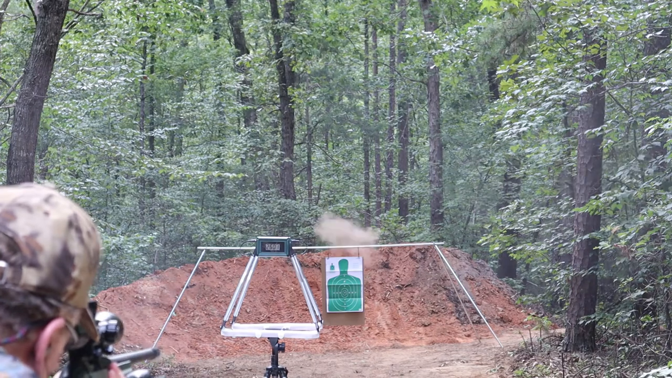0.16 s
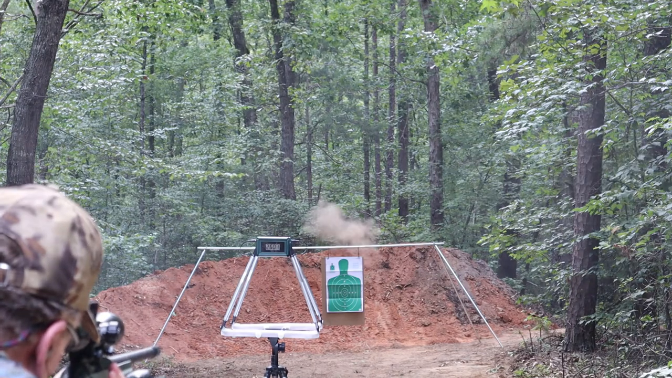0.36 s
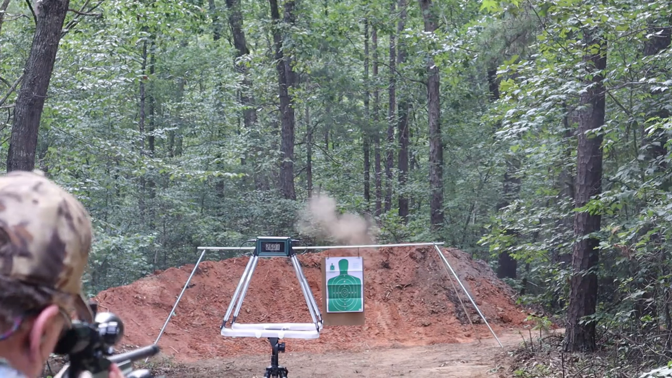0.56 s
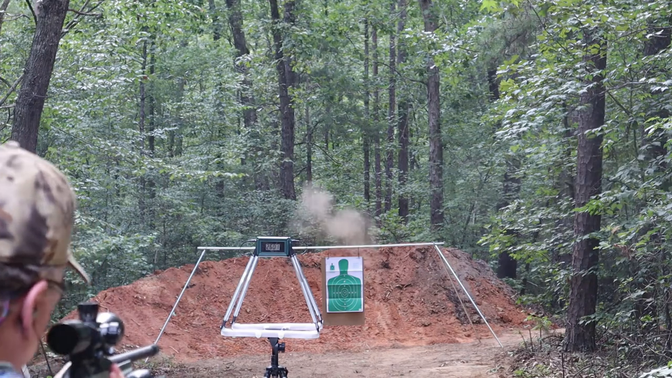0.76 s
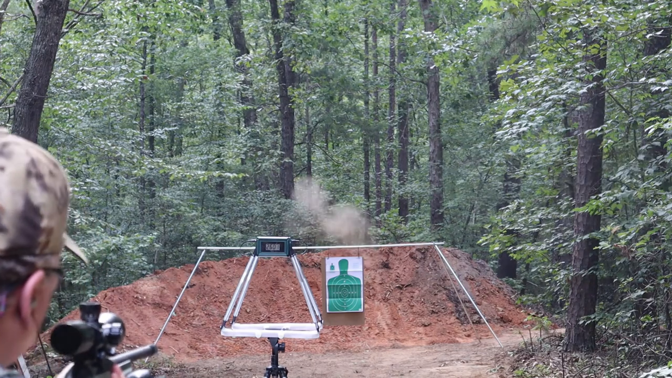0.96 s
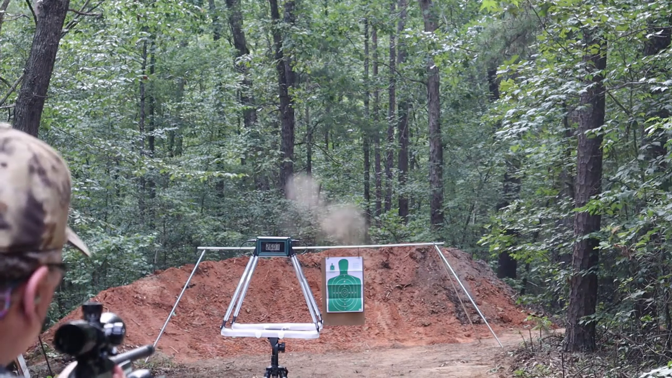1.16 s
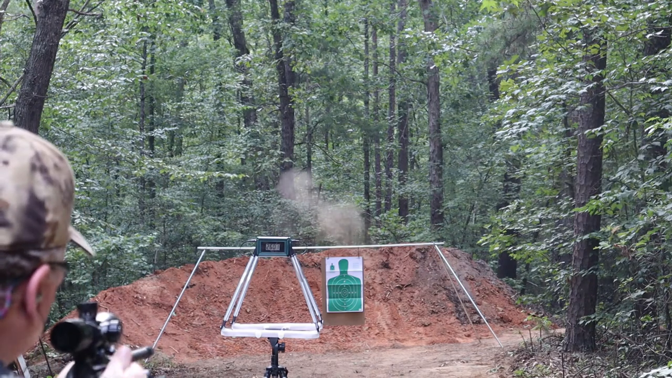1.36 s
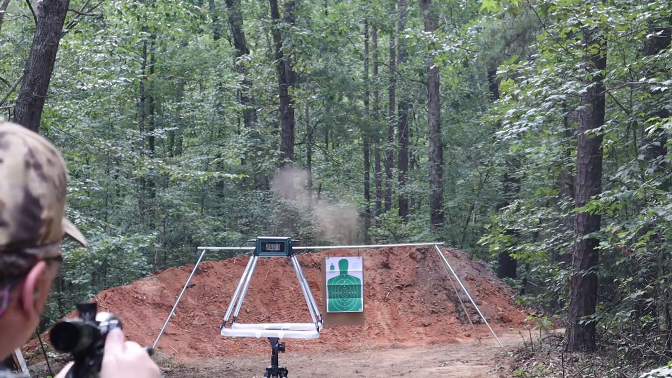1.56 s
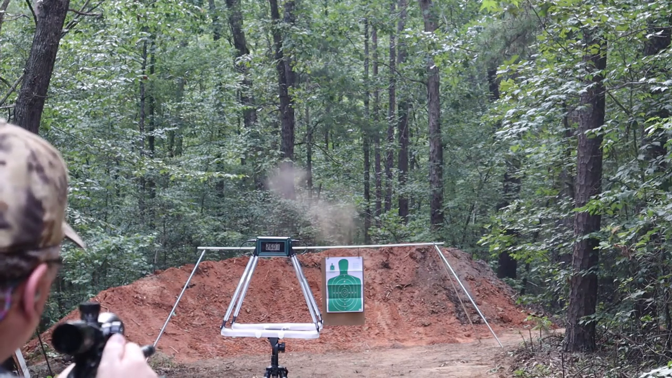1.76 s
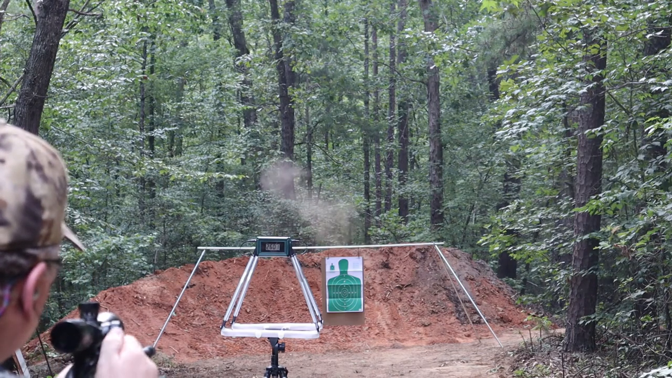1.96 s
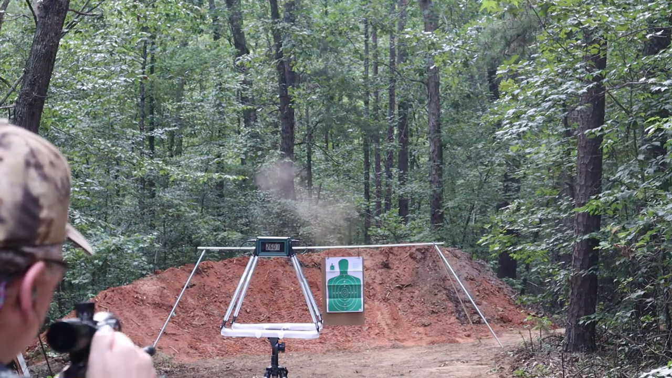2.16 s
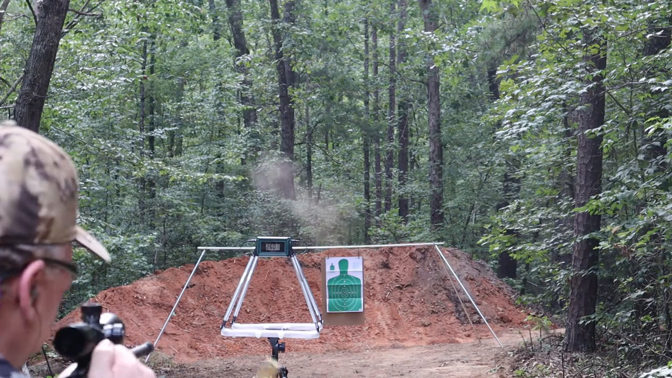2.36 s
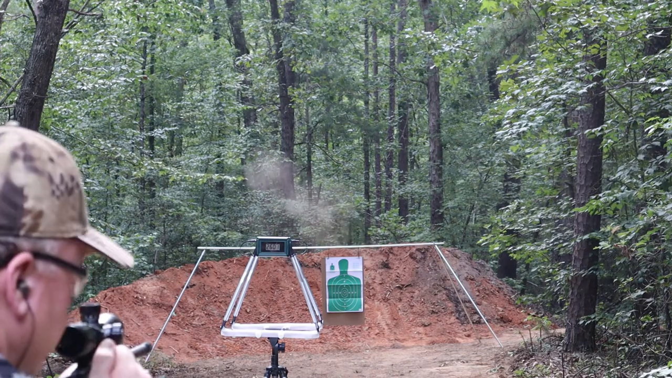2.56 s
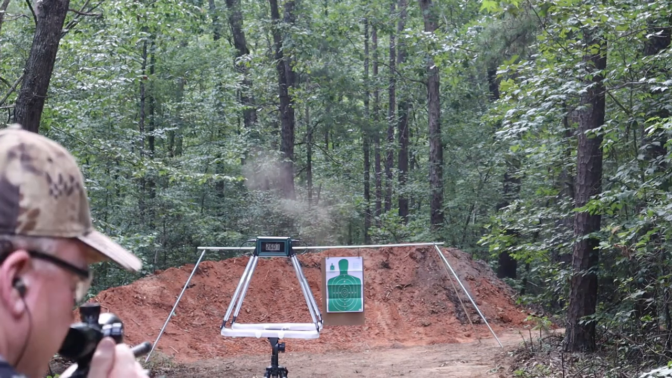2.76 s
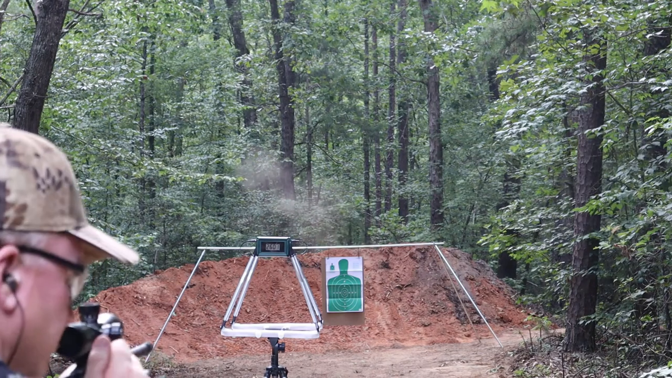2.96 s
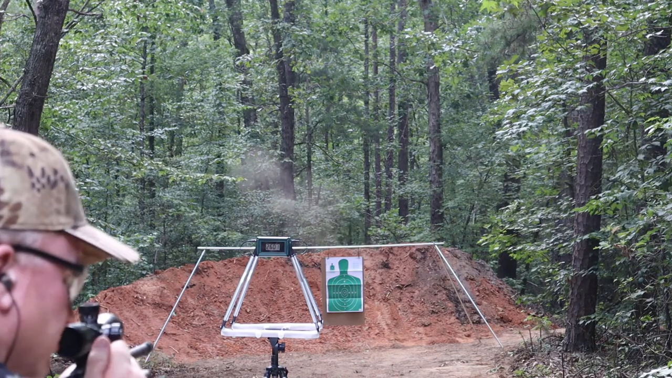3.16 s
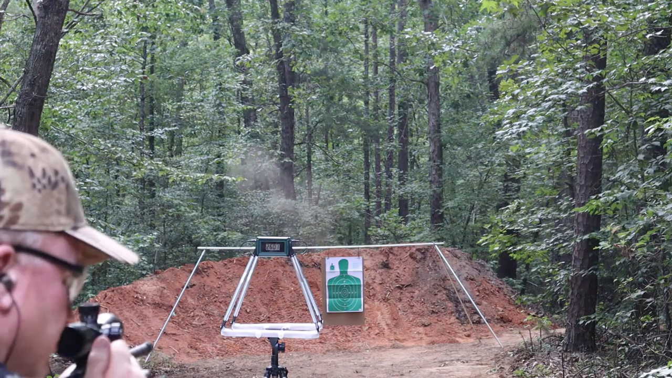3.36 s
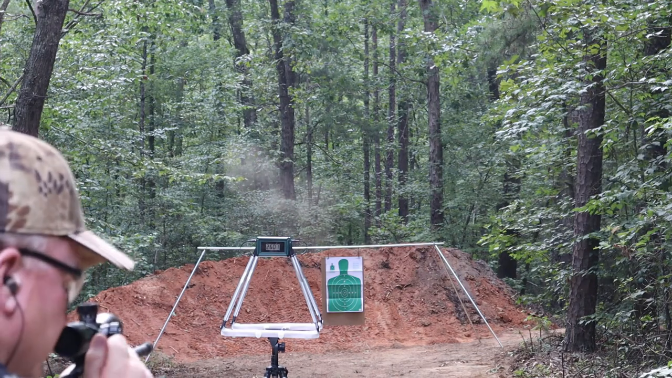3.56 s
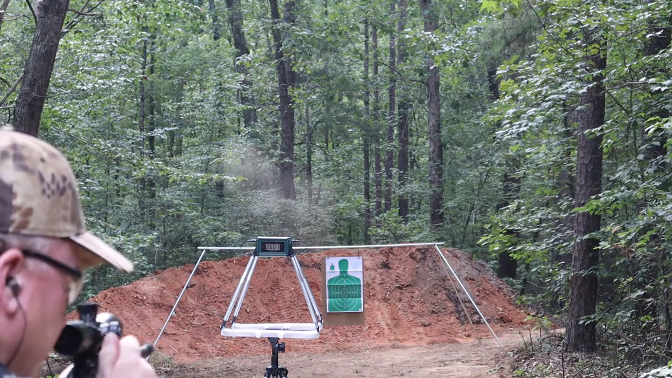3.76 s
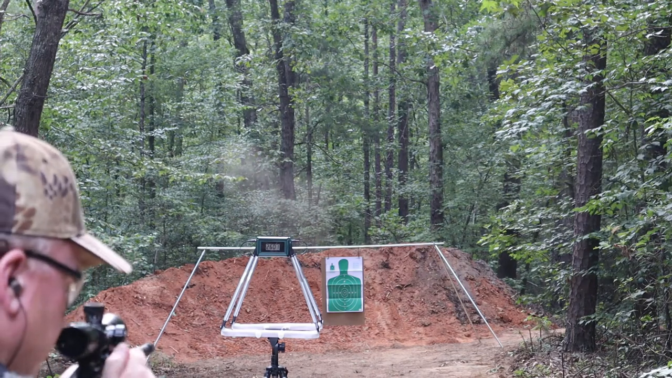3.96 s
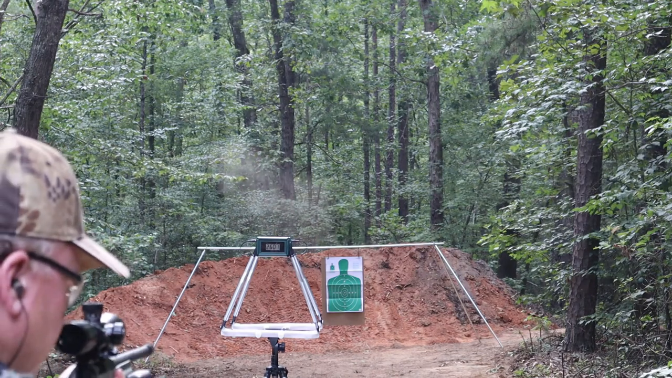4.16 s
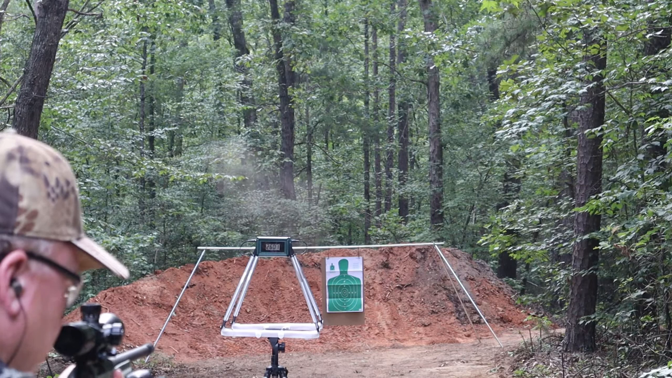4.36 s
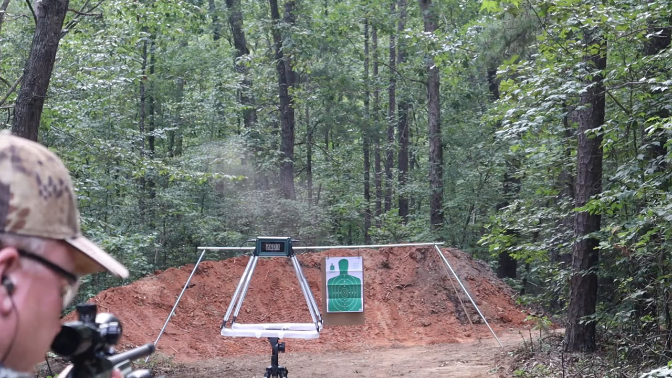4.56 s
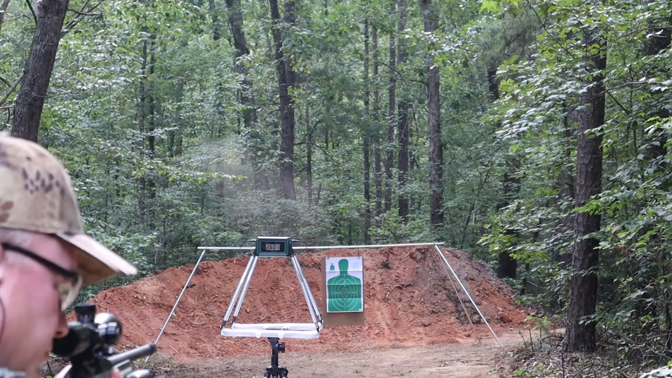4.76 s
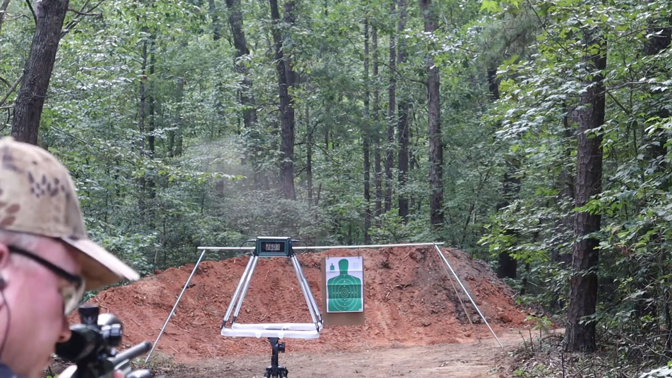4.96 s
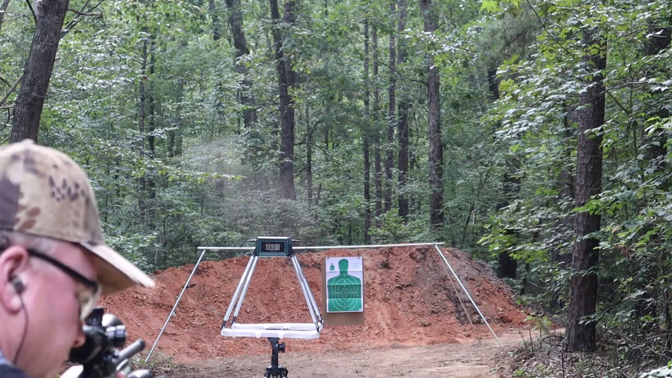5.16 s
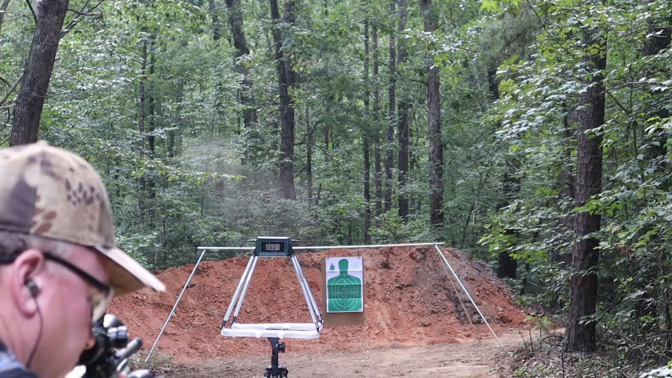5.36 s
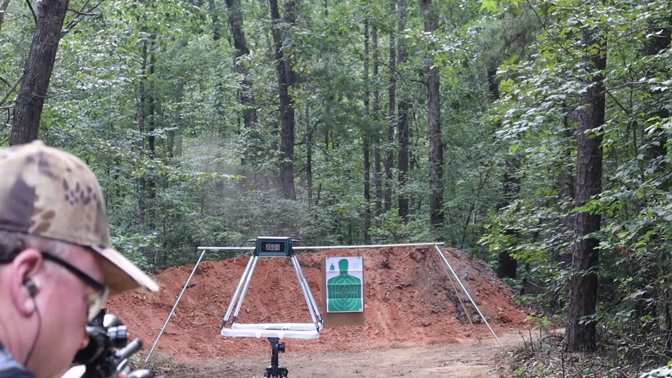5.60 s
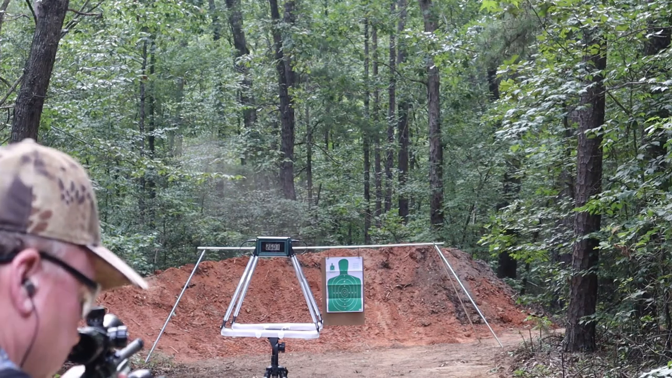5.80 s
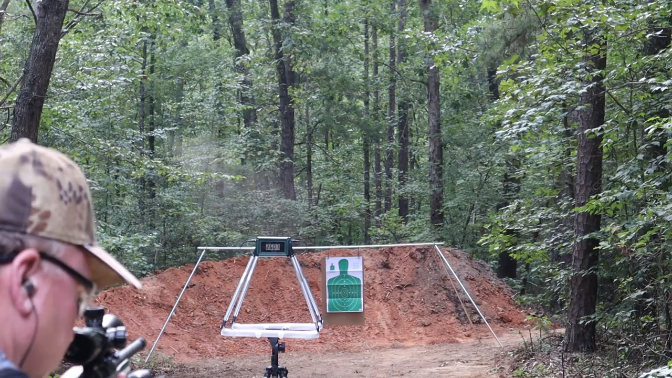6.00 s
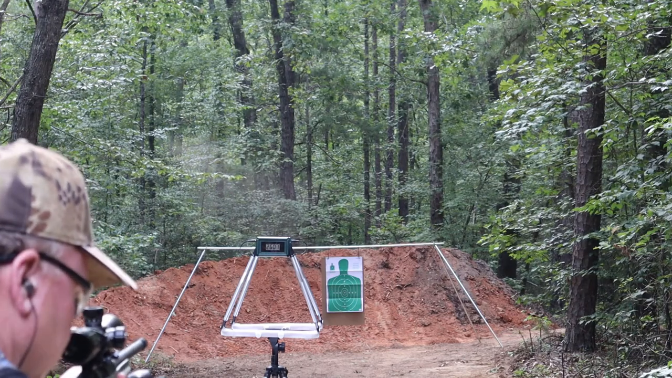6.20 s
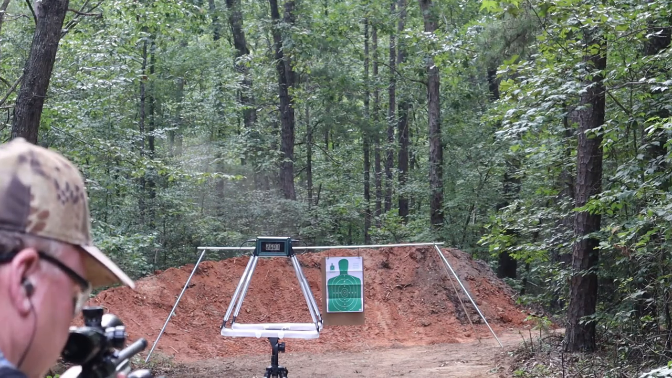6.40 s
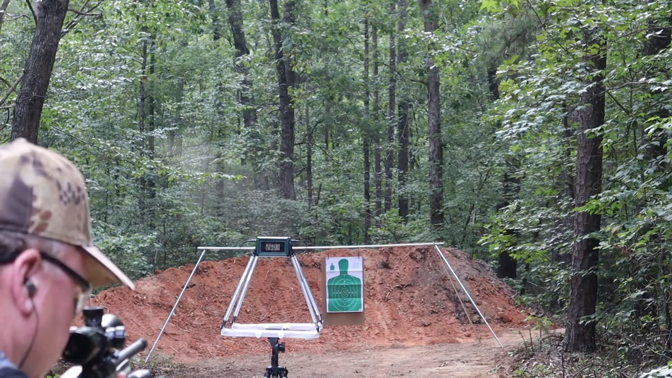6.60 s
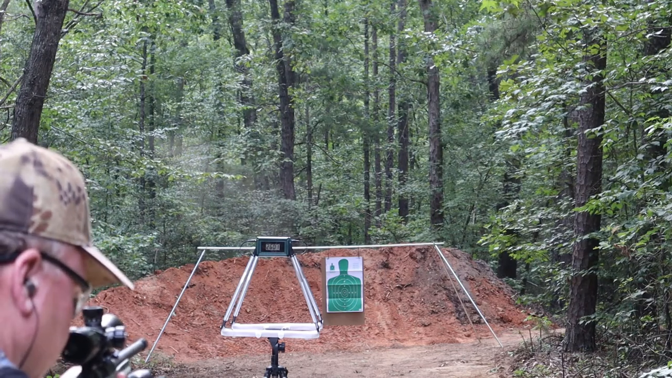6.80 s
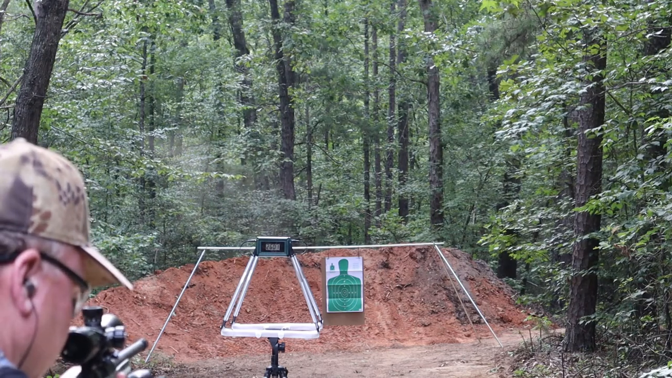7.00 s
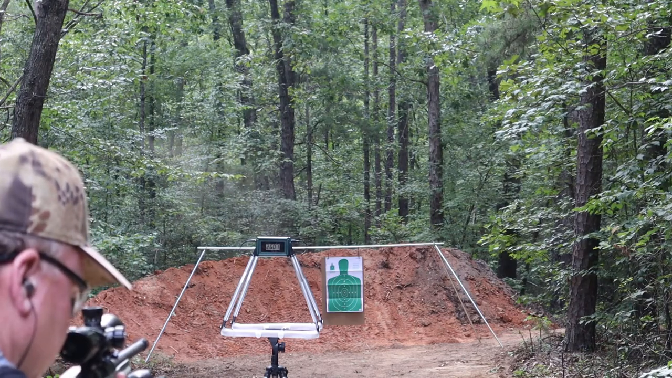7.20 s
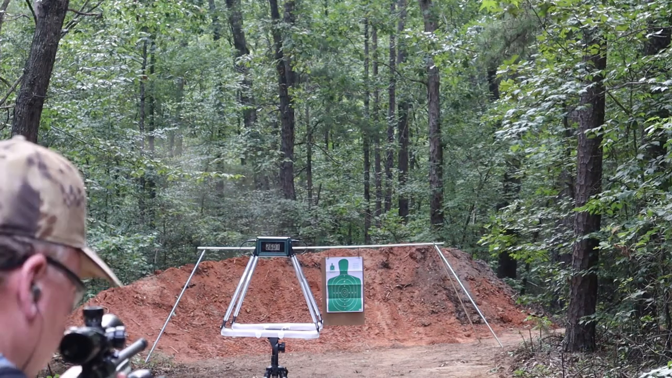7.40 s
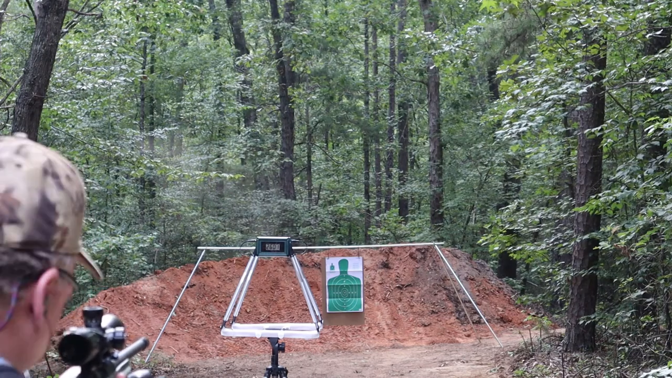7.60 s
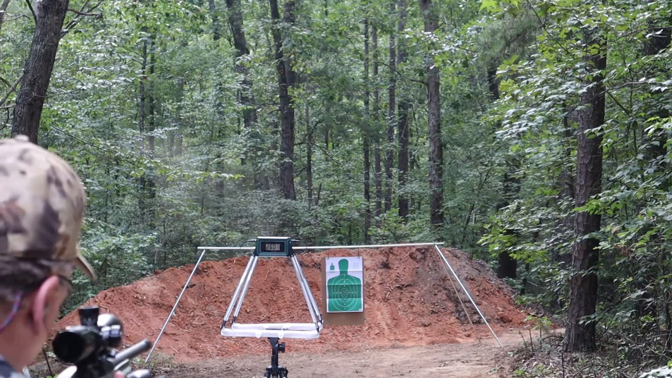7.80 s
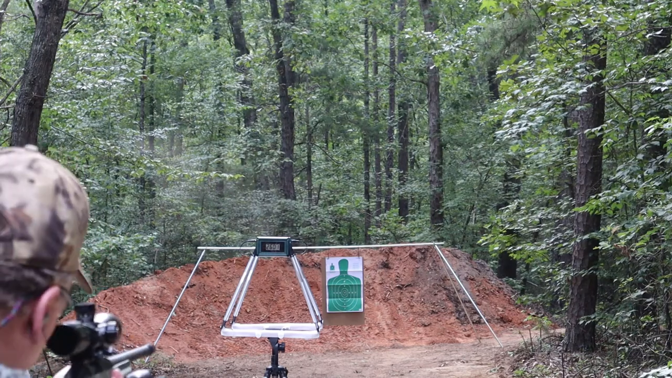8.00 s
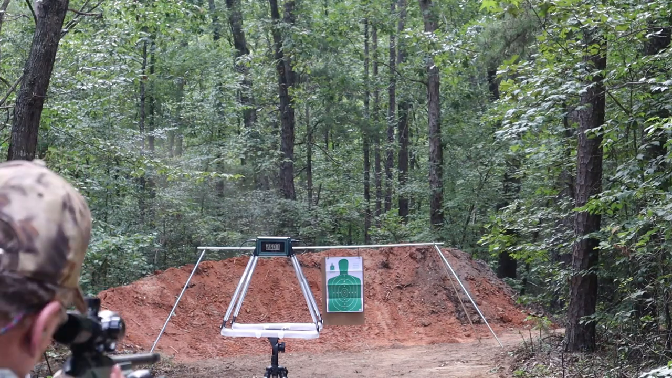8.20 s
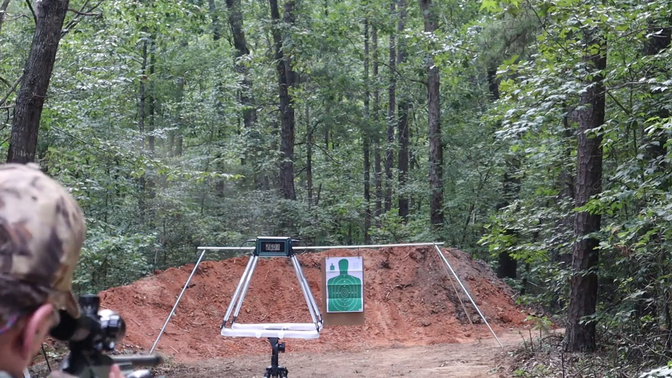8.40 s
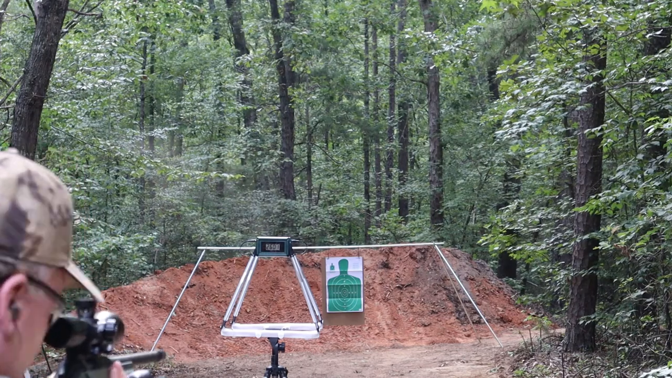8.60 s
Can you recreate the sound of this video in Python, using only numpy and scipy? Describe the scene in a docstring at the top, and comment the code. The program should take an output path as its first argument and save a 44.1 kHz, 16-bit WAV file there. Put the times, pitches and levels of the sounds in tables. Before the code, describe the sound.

Outdoors in a wood, the echo of a rifle shot rolls away unevenly over about three seconds. Close to the stereo microphone, the bolt is lifted and drawn with crisp steel clicks; the spent case rings thinly and knocks on a wooden bench. The bolt scrapes forward and locks with loud clacks. Afterwards come quiet leaves, insects and a few light bench knocks.

```python
"""Rifle bolt worked in an echoing wood

A shot's echo rolls away as sparse noise returns from trunks, over filtered noise for rumble, leaves and insects
that swells back. Close by, struck modes and sliding noise make the bolt being lifted, drawn, pushed home and locked.
The spent case rings in two beating modes and knocks on a wooden bench; a hand knocks now and then, a soft swish
rises. Two close ports give sum and difference; the difference is strong in the treble. Near trees add a noisy tail."""
import sys
import numpy as np
from scipy import signal
from scipy.fft import rfft, irfft
from scipy.io import wavfile
from scipy.ndimage import uniform_filter1d

SR = 44100
rng = np.random.default_rng(int(sys.argv[2]) if len(sys.argv) > 2 else 0)


def digitize_waveform(pressure):
    """Quantize a signal to 16-bit integers and store it at the path in sys.argv[1].

    Rows of a 2-D input are taken as channels; values are limited to [-1, 1].
    """
    field = np.atleast_2d(pressure).T
    bounded = np.clip(field, -1, 1)
    quanta = np.round(bounded * 32767).astype(np.int16)
    wavfile.write(sys.argv[1], SR, quanta)


N = 381134  # length in samples
FRAME, HOP = 512, 128  # spectral frames, in samples
HZ = np.fft.rfftfreq(FRAME, 1 / SR)


def gain_of(db):
    """Decibels to an amplitude factor."""
    return 10 ** (np.asarray(db) / 20)


def read(points, hz):
    """A table read on a log-frequency axis."""
    f, value = np.transpose(points)
    return np.interp(np.log(hz + 1), np.log(f + 1), value)


def evened(x):
    """Scaled to rms 1."""
    return x / np.sqrt(np.mean(x ** 2) + 1e-20)


def patches(shape, frames, bins):
    """Random unevenness of rms 1, smoothed over time frames and frequency bins."""
    noise = rng.standard_normal(shape)
    return evened(uniform_filter1d(uniform_filter1d(noise, frames, axis=1), bins, axis=0))


def add(mix, s, sound):
    """Mixes a sound in from second s on."""
    part = mix[:, round(s * SR):][:, :sound.shape[-1]]
    part += sound[..., :part.shape[1]]


def spectrogram(x):
    """Overlapping short spectra."""
    return signal.stft(x, nperseg=FRAME, noverlap=FRAME - HOP)[2]


def shaped(pair, field_db, width):
    """Colours sum and difference by a level field over frequency and time."""
    z = spectrogram(pair)
    t = np.arange(z.shape[-1]) * HOP / SR
    sum_and_difference = np.array([np.ones(len(HZ)), gain_of(read(width, HZ))])
    z = z * gain_of(field_db(t)) * sum_and_difference[:, :, None]
    return signal.istft(z, nperseg=FRAME, noverlap=FRAME - HOP)[1][:, :pair.shape[1]]


def unit_db(spectrum_db):
    """Shifts a spectrum, per column, so that white noise through it keeps rms 1."""
    return spectrum_db - 10 * np.log10(np.mean(gain_of(spectrum_db) ** 2, axis=0))


def bandpass(order, low_hz, high_hz, x):
    """Keeps one band of a sound."""
    return signal.sosfilt(signal.butter(order, [low_hz, high_hz], "bandpass", fs=SR, output="sos"), x)


def favoured(modes, struck_hz, db_per_octave):
    """The place of a blow favours the modes near one frequency."""
    return [(hz, db - db_per_octave * abs(np.log2(hz / struck_hz)), t60) for hz, db, t60 in modes]


TOGETHER = .75  # chance that a blow pushes a mode the positive way, which sharpens its first swing


def ring(modes, length, count=1, spread_db=1.0, band=0.024, chatter=0.0017, chatter_db=-16, rise=0.0004,
         swell=0.01):
    """Clusters of decaying modes, driven by a blow and chattering contacts; swell is in cycles, peak is 1."""
    hz, db, t60 = np.repeat(modes, count, axis=0).T[:, :, None]
    size = (len(hz), 1)
    strength, place = rng.standard_normal(size), rng.random(size)
    sign = np.where(rng.random(size) < TOGETHER, 1, -1)
    # members fill the cluster evenly
    place = 2 * (np.arange(len(hz))[:, None] % count + place) / count - 1
    t = np.arange(round(t60.max() * length * SR) + 400) / SR
    build_up = 1 - np.exp(-t * hz / swell)
    decay = gain_of(db + spread_db * strength - 60 * t / (t60 * length))
    x = (sign * build_up * decay * np.sin(2 * np.pi * hz * (1 + band * place) * t)).sum(0)
    contacts = gain_of(chatter_db) * rng.standard_normal(400) * np.exp(-t[:400] / chatter)
    x = x + np.convolve(x, contacts)[:len(t)]
    x = x * (1 - np.exp(-t / rise))
    return x / abs(x).max()


# spectra of the far rumble, the leaves and the insect chorus: f/Hz, relative level/dB per Hz
RUMBLE = [(12, -30), (20, -10), (70, 2), (185, -19), (300, -4.5), (326, -19), (452, -13), (648, -19.5),
          (1200, -26), (1560, -32.5), (2640, -120)]
LEAVES = [(700, 0), (1030, -3.5), (1170, -5.5), (1640, -3), (7400, -16), (9200, -19.5), (12500, -22.5),
          (13500, -31), (15700, -53)]
INSECTS = [(7300, -48), (7700, -6), (8150, -0.5), (8420, 5), (8850, -3.5), (9050, -36.5)]
# rumble, leaves, insects: full level/dB, starts lower by/dB, later drift/dB per s, patchiness/dB
LAYERS = [(-55, 20, 0.01, 1.5), (-62, 16, -0.66, 1.3), (-75, 19, 0.56, 1.5)]
# stereo width of the wood, also for the swish and the near trees: f/Hz, difference over sum/dB
WOOD_WIDTH = [(60, -21.5), (110, -11.5), (200, -2), (360, -3), (670, 0.5), (1210, 2.5), (2210, 3.5),
              (4040, 3.5), (7370, 6.5), (13400, 5.5)]
SWELL_FROM_S, SWELL_TO_S = 0.6, 3.87  # held down after the shot, swelling back between these times
BASS_SWELL_AT_S, BASS_SWELL_SPREAD_S, BASS_SWELL_DB = 7.7, 0.72, 4.1  # the lows swell once


def background():
    """Far rumble, leaves and insects: filtered noise, each in drifting patches."""
    out = np.zeros((2, N))
    for shape, (full_db, lower_db, drift_db, patchy_db) in zip((RUMBLE, LEAVES, INSECTS), LAYERS):
        def field_db(t):
            held_down = np.clip((SWELL_TO_S - t) / (SWELL_TO_S - SWELL_FROM_S), 0, 1)
            level_db = full_db - lower_db * held_down ** 0.82 + drift_db * np.maximum(t - SWELL_TO_S, 0)
            bump = np.exp(-((t - BASS_SWELL_AT_S) / BASS_SWELL_SPREAD_S) ** 2)
            swell_db = BASS_SWELL_DB * bump * (HZ[:, None] < 130)
            uneven_db = patchy_db * patches((len(HZ), len(t)), 30, 4)
            return unit_db(read(shape, HZ))[:, None] + swell_db + level_db + uneven_db
        out += shaped(rng.standard_normal((2, N)), field_db, WOOD_WIDTH)
    return out


# one soft rising swish: start t/s, length/s, first f/Hz, last f/Hz, width/Hz, level/dB
SWISH = (4.45, 0.13, 3700, 5200, 1500, -66.5)


def swish():
    """A band of noise that glides up, fading in and out."""
    start, length, first_hz, last_hz, width, db = SWISH

    def field_db(t):
        u = np.clip((t - start) / length, 0, 1)
        centre_hz = first_hz + (last_hz - first_hz) * u
        band_db = -20 * np.log10(1 + ((HZ[:, None] - centre_hz) / (width / 2)) ** 2)
        return unit_db(band_db) + db + 20 * np.log10(np.sin(np.pi * u) + 1e-6)
    return shaped(rng.standard_normal((2, N)), field_db, WOOD_WIDTH)


# how the echo off the trunks dies away: t/s, level/dB
ECHO = [(0.0, -32.5), (0.045, -31.5), (0.105, -27.5), (0.14, -29), (0.18, -28.5), (0.26, -30.5),
        (0.4, -35.5), (1.0, -44.5), (2.1, -55), (3.0, -57), (3.6, -66), (4.2, -88)]
# spectrum of the near echoes: f/Hz, relative level/dB per Hz
BLAST = [(18, -55), (30, -12), (144, -20), (259, -17.5), (372, -5.5), (654, -3.5), (1040, -10.5),
         (2490, -13.5), (2690, -15), (3050, -13.5), (10200, -23), (13500, -28.5), (14300, -59)]
# echo fading by frequency, deep bass and treble fastest: f/Hz, relative loss after one second/dB
FADE_BY_PITCH = [(60, 24.5), (200, -1), (500, 1), (1000, 5.5), (2000, 14), (4000, 29), (8000, 47),
                 (14000, 68)]
# stereo width of the echo before its left-right balance: f/Hz, difference over sum/dB
ECHO_WIDTH = [(60, -7), (110, -20), (200, -26), (360, -13), (670, -6), (1210, 0), (2210, 2.5), (4040, 4.5),
              (7370, 5.5), (13400, 5.5)]
# left-right balance of the echo, differing from band to band: f/Hz, left over right/dB
ECHO_BALANCE = [(60, 0), (110, -1), (200, 1.5), (360, 2.5), (670, 2.5), (1210, 2), (2210, -2.5), (4040, 2),
                (7370, 1.1), (13400, -4)]
# returns off single big trunks: t/s, peak level/dB
SLAPS = [(0.101, -20.5), (0.1652, -15.5), (0.239, -22)]
SURGE_DB = 1.6  # the echo rolls in uneven surges


def echo():
    """Every trunk returns the blast once; deep bass and treble die fastest."""
    s, level_db = np.transpose(ECHO)
    n = round(s[-1] * SR)
    trunk_gain = gain_of(1.0 * np.minimum(rng.exponential(1, n), 4))
    trunks = rng.standard_normal((2, n)) * trunk_gain * (rng.random(n) < 12000 / SR)
    loud = (HZ > 300) & (HZ < 900)  # the band that sets the level

    def field_db(t):
        colour = read(BLAST, HZ)[:, None] - read(FADE_BY_PITCH, HZ)[:, None] * t ** 1.075
        loud_db = 10 * np.log10(np.mean(gain_of(colour) ** 2 * loud[:, None], 0))
        surge_db = SURGE_DB * patches(colour.shape, 9, 14)
        return surge_db + colour - loud_db + np.interp(t, s, level_db)
    fade_out = np.minimum((n - np.arange(n)) / 8000, 1)
    mid, side = shaped(evened(trunks), field_db, ECHO_WIDTH) * fade_out
    for at, db in SLAPS:
        u = np.arange(-60, 200) / SR / 0.00036  # a blast pulse rounded by distance
        add(mid[None], at, gain_of(db) * (1 - u ** 2) * np.exp(-u ** 2 / 2))
    balance = gain_of(read(ECHO_BALANCE, np.fft.rfftfreq(n, 1 / SR)))
    side = side + irfft(rfft(mid) * (balance - 1) / (balance + 1), n)
    return np.pad([mid, side], ((0, 0), (0, N - n)))


# how long the near trees linger: f/Hz, t60/s
NEAR_TREES = [(150, 0.86), (600, 0.4), (2000, 0.36), (5000, 0.43), (8000, 0.36), (12000, 0.38)]
# colour of their returns: f/Hz, relative level/dB
TREES_COLOUR = [(70, -30), (200, -9), (600, -4), (2000, 1), (5000, 2), (8000, 2.5), (12000, 2), (14000, 0)]
CLUMP_DB = 1.3  # unevenness of the returns


def trees(x):
    """Countless weak returns round the clearing: each sound's power lingers as noise, band by band."""
    power = uniform_filter1d(abs(spectrogram(x)) ** 2, size=9, axis=0)

    def field_db(t):
        late = t[:350]
        start_db = np.interp(late, [0, .012, .03], [-40, -6, 0])
        decay_db = 60 * late / read(NEAR_TREES, HZ)[:, None]
        tail = gain_of(read(TREES_COLOUR, HZ)[:, None] - decay_db + start_db) ** 2
        lingering = abs(signal.fftconvolve(power, tail, axes=1)[:, :len(t)])
        clumps = patches(power.shape, 4, 25)  # trunks stand unevenly
        return 10 * np.log10(lingering + 1e-20) + CLUMP_DB * clumps
    return shaped(rng.standard_normal((2, N)), field_db, WOOD_WIDTH)


# two close modes of the spent case: f/Hz, t60/s before each ring's length factor
BRASS = [(10207, .36), (10160, .3)]
# the case rings when struck, shorter on the boards:
# t/s, first mode level/dB, ring length factor, second mode relative level/dB
RINGS = [(2.2687, -58, 1.0, -5), (2.293, -55, 1.1, -9), (2.308, -40, 0.18, -14), (2.321, -46, 1.1, -8),
         (2.335, -52.5, 1.2, -1), (2.82, -52, 0.4, -13), (2.8937, -54.5, 0.5, -16),
         (3.0093, -43, 0.66, -19), (3.121, -46.5, 0.58, -9), (3.2265, -63.5, 0.55, -12)]


def brass():
    """The thin ring of the spent case: two close modes beat; each new contact stills the old ring."""
    out = np.zeros((2, N))
    next_contacts = [row[0] for row in RINGS[1:]] + [N / SR]
    for (s, db, length, second_db), until in zip(RINGS, next_contacts):
        t = np.arange(round(min(until - s, .5) * SR)) / SR
        tone = sum(gain_of(mode_db - 60 * t / (t60 * length)) * np.sin(2 * np.pi * (hz * t + rng.random()))
                   for (hz, t60), mode_db in zip(BRASS, (0, second_db)))
        onset = 1 - np.exp(-t / 0.00066)
        stilled = 1 - np.exp((t - t[-1]) / 0.0012)
        add(out, s, gain_of(db) * tone * onset * stilled * [[1], [.9]])
    return out


# low modes of the whole bench: f/Hz, relative level/dB, t60/s before the length factor
LEGS = [(141.4, 1, 0.085), (187.3, 1, 0.15), (222, -4.5, 0.11)]
BOOM_LENGTH = 1.75  # factor on the ring times of the frame


def boom():
    """The frame of the bench swings up slowly and booms."""
    return ring(LEGS, BOOM_LENGTH, band=0.062, chatter_db=-38, rise=0.0033)


# the case, and a hand, knock on the bench: t/s, tick level/dB, thud level/dB,
# boards ring most near f/Hz, boom level/dB, ring length factor, contact/ms
KNOCKS = [(2.616, -39, -20, 1200, -44, 0.21, 0.64), (2.6193, -59, -25, 702, -41.5, 0.3, 0.62),
          (2.625, -52, -27, 604, -53, 0.85, 0.93), (2.8208, -28, -28.5, 1000, -45, 1.04, 0.31),
          (2.8943, -43.5, -34, 1200, -56, 0.4, 0.17), (2.905, -63, -36, 1000, -62, 0.49, 0.28),
          (2.9154, -56, -36, 1000, -62, 0.37, 0.47), (2.925, -64, -38, 800, -62.5, 0.59, 0.46),
          (3.0, -60, -42, 1000, -59, 1.1, 0.21), (3.0112, -26.5, -31.5, 1020, -55, 1.2, 0.29),
          (3.121, -32.5, -35.5, 990, -74, 0.84, 0.22), (3.1823, -54, -39.5, 1300, -70, 0.59, 0.19),
          (3.194, -58, -39.5, 1300, -72, 1.3, 0.31), (3.2274, -44, -39, 1400, -79, 1.14, 0.33),
          (5.407, -67, -47, 1400, -64.5, 0.7, 0.36), (5.4235, -61, -48, 1100, -54, 0.62, 0.22),
          (5.5268, -57, -52.5, 1100, -57, 0.92, 0.24), (6.737, -52, -28.5, 1300, -52, 0.2, 0.39),
          (6.7402, -48, -26.5, 775, -50.5, 0.99, 0.66), (7.53, -75, -44.5, 450, -40.5, 0.7, 1.9),
          (7.547, -75, -47.5, 400, -55, 0.6, 1.36)]
# modes of the boards, then of the tick: f/Hz, relative level/dB, t60/s before the length factors
BENCH = [(362, -1, 0.16), (471, 2, 0.16), (590, -12.5, 0.2), (718.6, -1, 0.15), (765.6, 1.5, 0.11),
         (919, -2.5, 0.11), (1103, -0.5, 0.071), (1247, 4.5, 0.047), (1447, -1.5, 0.16), (1510, -8.5, 0.15),
         (1580, -9, 0.071), (1760, -4, 0.072), (1880, -7, 0.043), (1960, 5, 0.083), (2280, -3, 0.057),
         (2680, -4, 0.045), (3250, -2, 0.03)]
TICK = [(1880, -4.5, 0.19), (2520, 4, 0.061), (3460, 4.5, 0.022), (3950, 4, 0.023), (4920, 3, 0.0082),
        (7100, -27, 0.0079), (9800, -13, 0.0049)]
SNAP_S, SNAP_SHARE = 0.00007, 1.06  # one short swing opens each tick: time constant, share of tick level


def bench():
    """Tick of the contact, thud of the boards, boom of the frame."""
    out = np.zeros((2, N))
    u = np.arange(60) / SR / SNAP_S
    snap = SNAP_SHARE * (1 - u) * np.exp(-u)
    for s, tick_db, thud_db, struck_hz, boom_db, length, contact_ms in KNOCKS:
        # a long soft contact leaves high modes still
        push = np.hanning(max(round(contact_ms * SR / 1000), 1) + 2)
        struck = favoured(BENCH, struck_hz, 4)
        # each spot on the boards shifts the modes a little (band)
        boards = ring(struck, 0.79 * length, band=.015, chatter=0.0095, chatter_db=-29.5, swell=0.54)
        thud = np.convolve(boards, push)
        tick = ring(TICK, 0.59 * length, count=10, band=0.142, chatter=0.004, chatter_db=-25.5)
        for db, sound in ((thud_db, thud / abs(thud).max()), (boom_db, boom()), (tick_db, snap), (tick_db, tick)):
            add(out, s, gain_of(db) * sound)  # alike in sum and difference
    return out


# bolt blows: t/s, steel level/dB, steel rings most near f/Hz, crack level/dB, stock level/dB, bench boom level/dB
BOLT = [(1.472, -43, 7000, -43.5, -59, -64), (1.496, -41.5, 2000, -54, -53, -66),
        (1.501, -35.5, 3000, -42, -51, -58), (2.21, -36, 3670, -35, -50, -63),
        (2.2321, -42, 2120, -51, -44, -61), (2.2469, -36, 2600, -40, -66, -53),
        (2.265, -39, 2500, -55, -57, -67), (2.2698, -42, 2580, -48, -60, -61),
        (2.282, -48, 2300, -55, -63, -69), (2.3072, -40, 3300, -50, -55, -76),
        (2.312, -45, 1250, -55, -57, -65), (2.3277, -37, 3000, -48, -60, -68),
        (2.3338, -25, 2300, -28, -35, -48.5), (2.3365, -30, 1900, -28, -39, -57),
        (3.5132, -50, 1350, -66, -51, -82), (3.536, -43, 2540, -66.5, -57, -66),
        (3.666, -39.5, 1500, -60, -40, -68), (3.694, -37, 1100, -58, -40, -71),
        (3.7213, -27, 1100, -39, -40, -68), (3.7277, -40, 4430, -30, -60, -66),
        (3.744, -28, 2200, -42, -50, -66), (3.7504, -24.5, 3020, -34, -38, -58),
        (3.7535, -21, 1900, -33, -38, -63), (3.7923, -19, 2200, -40, -55, -70),
        (3.7942, -16.5, 1910, -19, -21.5, -43.5), (3.7965, -20.5, 2200, -35, -40, -57),
        (3.7978, -22, 2240, -38, -41, -55), (3.828, -36, 1100, -53, -35.5, -57),
        (4.084, -21.5, 1970, -24.5, -38, -40.5), (4.1236, -11.5, 2080, -25, -20.5, -39),
        (4.126, -19, 2400, -34, -44, -35.5), (8.326, -48, 2500, -50.5, -86, -57)]
# modes of the steel, then of the stock: f/Hz, relative level/dB, t60/s before the length factors
STEEL = [(1446, 0.5, 0.04), (1894, 0.5, 0.032), (2180, -2.5, 0.034), (2910, 0.5, 0.033), (3465, 3.5, 0.022),
         (3840, -33, 0.014), (4660, 3, 0.028), (5280, -1.5, 0.044), (6570, 7.5, 0.013), (7760, -6, 0.063),
         (8900, 0, 0.014), (11200, -4, 0.041)]
STOCK = [(360, -15, 0.37), (503, 4, 0.1), (791, 8, 0.096), (1120, -5.5, 0.13)]


def bolt_blows():
    """Each blow cracks, rings the steel, thumps the stock and booms the bench."""
    out = np.zeros((2, N))
    t = np.arange(400) / SR
    for s, steel_db, struck_hz, crack_db, stock_db, boom_db in BOLT:
        crack = bandpass(2, 5000, 11500, rng.standard_normal(400))
        crack = crack * np.exp(-t / .0015) * (1 - np.exp(-t / .0005))
        crack = crack / abs(crack).max()
        steel = ring(favoured(STEEL, struck_hz, 8.0), 0.79, count=6, band=0.0915, chatter_db=-28.0)
        stock = ring(STOCK, 0.63, count=4, band=0.159, chatter=0.0013, chatter_db=-39.0)
        for db, sound in ((steel_db, steel), (stock_db, stock), (crack_db, crack), (boom_db, boom())):
            add(out, s, gain_of(db) * sound)
    return out


# steel slides on steel: start t/s, length/s, time to reach the last level/s, first level/dB, last level/dB,
# brightness/dB per octave, sings near f/Hz
SLIDES = [(1.485, 0.029, 0.012, -60, -53, -3, 2300), (2.216, 0.071, 0.04, -56.5, -55, 4.5, 2880),
          (2.266, 0.03, 0.025, -42, -54, 5.5, 2535), (2.288, 0.016, 0.014, -56, -58, 6, 4500),
          (2.314, 0.04, 0.019, -43, -54, -5, 1200), (3.694, 0.027, 0.025, -44, -45, 0, 4870),
          (3.724, 0.0186, 0.012, -31.5, -37, 1.5, 4550), (3.745, 0.042, 0.03, -36, -41, 1, 2220),
          (3.787, 0.0049, 0.007, -42, -32, -3, 2280)]
# resonances of the sliding bolt: f/Hz, width/Hz, relative level/dB
RASP = [(925, 100, 10.5), (1490, 250, 1.5), (2290, 470, 2), (3240, 280, -2), (4320, 210, 0),
        (5570, 230, -7), (11070, 820, -14)]
SING_WIDTH_HZ, SING_DB = 520, -6  # the band in which a slide sings, relative to its hiss
SLIDE_START_S, SLIDE_STOP_S = 0.0014, 0.015  # a stroke sets in, and dies by 60 dB


def bolt_slides():
    """Strokes of steel on steel hiss in uneven slips through the bolt's resonances."""
    out = np.zeros((2, N))
    resonances = sum(gain_of(db) ** 2 / (1 + ((HZ - f) / (width / 2)) ** 2) for f, width, db in RASP)
    body_db = 10 * np.log10(resonances + 0.0063)
    for s, length, reach, first_db, last_db, tilt_db, sing_hz in SLIDES:
        n = round(length * SR) + 1024
        t = np.arange(n) / SR
        catches = gain_of(3.3 * np.minimum(rng.exponential(1, n), 3)) * (rng.random(n) < 450 / SR)
        grip = np.convolve(catches, np.exp(-np.arange(300) / SR / .0008))[:n]
        slips = rng.standard_normal(n) * (0.6 + grip)
        colour = unit_db(body_db + np.log2(HZ / 2000 + 0.5) * tilt_db)[:, None]
        pair = evened(slips)[None] * [[1], [1.1]]
        hiss = shaped(pair, lambda frames: colour + 0 * frames, [(20, 0), (20000, 0)])
        half = SING_WIDTH_HZ / 2
        sing = bandpass(1, sing_hz - half, sing_hz + half, rng.standard_normal(n))
        hiss = hiss + gain_of(SING_DB) * evened(sing)
        stop_db = 60 * np.maximum(t - length, 0) / SLIDE_STOP_S
        stroke_db = np.interp(t, [0, reach], [first_db, last_db]) - stop_db
        add(out, s, hiss * gain_of(stroke_db) * np.minimum(t / SLIDE_START_S, 1))
    return out


# the ports on near sounds: f/Hz, gain of the difference/dB
PORTS = [(60, -9), (110, -26), (200, -30), (360, -22), (670, -17), (1210, -11), (2210, -6), (4040, 1.5),
         (7370, 1), (13400, 7)]


def ports(near):
    """A delay between the ports puts the difference a quarter cycle from the sum."""
    hz = np.fft.rfftfreq(N, 1 / SR)
    return np.array([near[0], irfft(rfft(near[1]) * 1j * gain_of(read(PORTS, hz)), N)])


KNOCK_RETURN_DB = -2.5  # low knocks reach the trees less
TREES_DB = 5.0  # gain of the near trees


def scene():
    """Sum and difference of all sources, turned into left and right."""
    no_deep_bass = signal.butter(2, 110, "highpass", fs=SR, output="sos")  # the near sounds carry no deep bass
    steel, wood = signal.sosfilt(no_deep_bass, [bolt_blows() + bolt_slides(), bench()])
    near = ports(steel + wood + brass())
    returns = gain_of(TREES_DB) * trees(steel[0] + gain_of(KNOCK_RETURN_DB) * wood[0])
    mid, side = background() + swish() + echo() + returns + near
    return np.array([mid + side, mid - side])


EDGE_HZ = 15700  # band limit


def record(dry):
    """The deep bass and the treble roll off, then the band limit."""
    soft = signal.sosfilt(signal.butter(8, 13600, fs=SR, output="sos"), dry)
    soft = signal.sosfilt(signal.butter(2, 38, "highpass", fs=SR, output="sos"), soft)
    edge = signal.firwin(511, EDGE_HZ, window=("kaiser", 9), fs=SR)
    return signal.oaconvolve(soft, edge[None], "same")


dry = scene()
out = record(dry)
digitize_waveform(out)
```